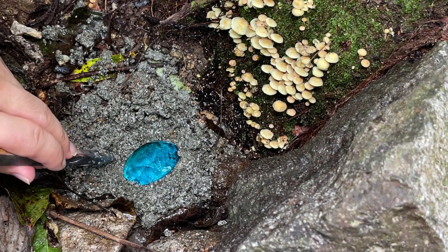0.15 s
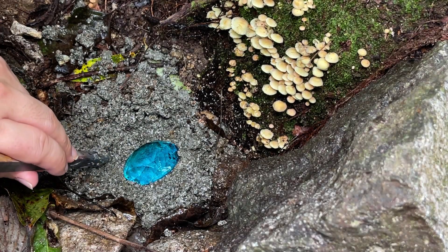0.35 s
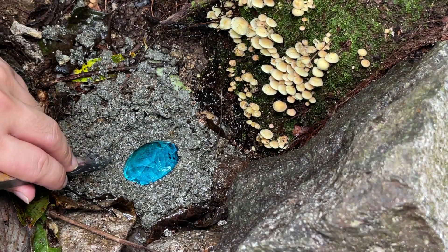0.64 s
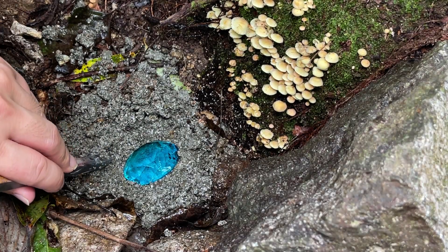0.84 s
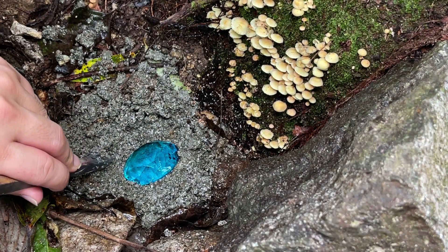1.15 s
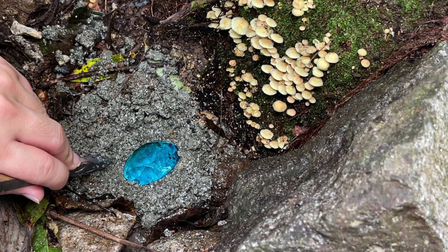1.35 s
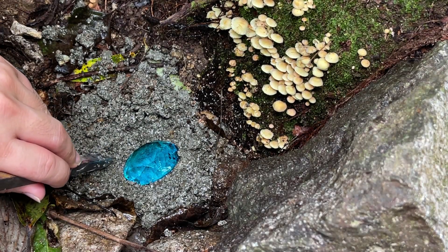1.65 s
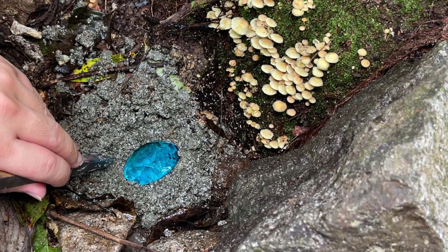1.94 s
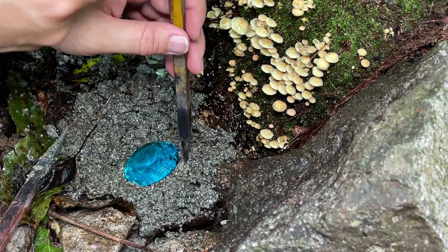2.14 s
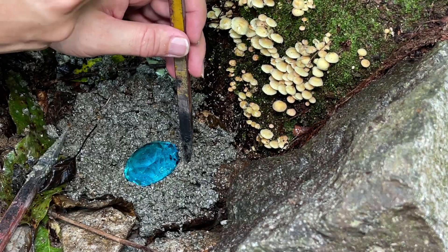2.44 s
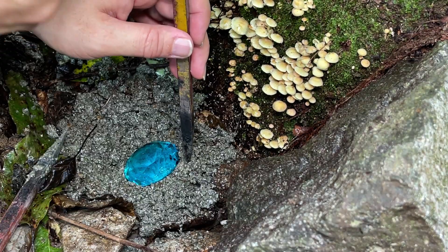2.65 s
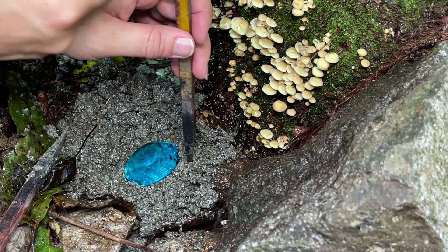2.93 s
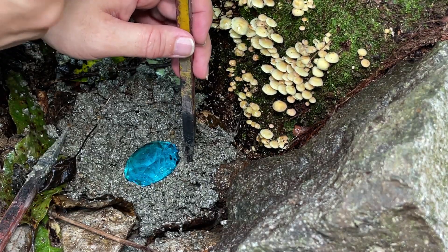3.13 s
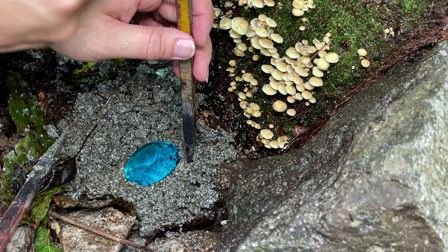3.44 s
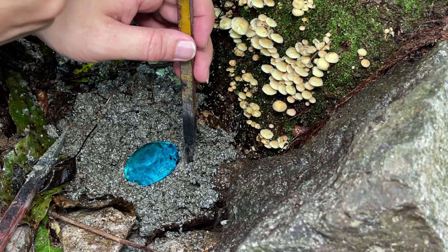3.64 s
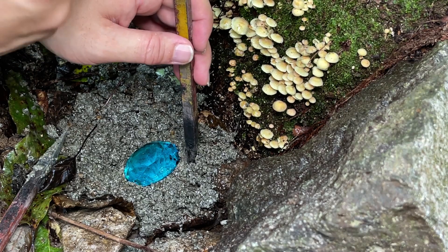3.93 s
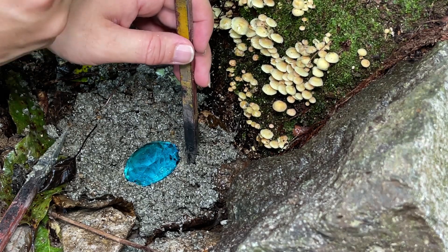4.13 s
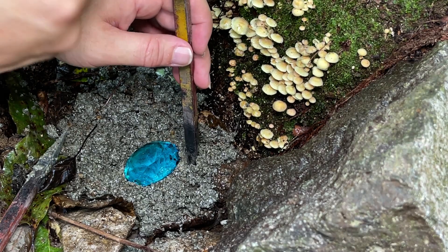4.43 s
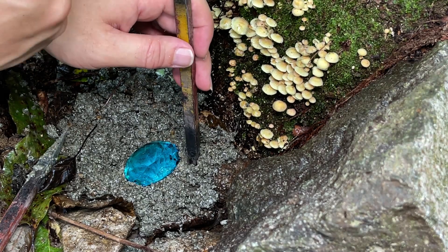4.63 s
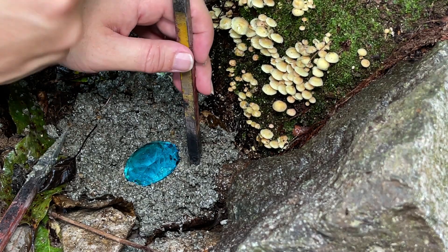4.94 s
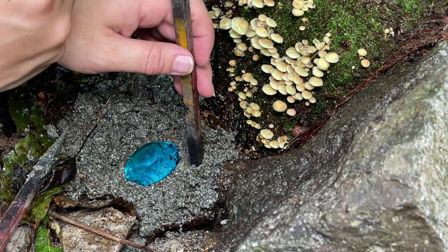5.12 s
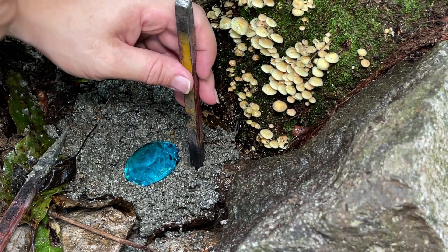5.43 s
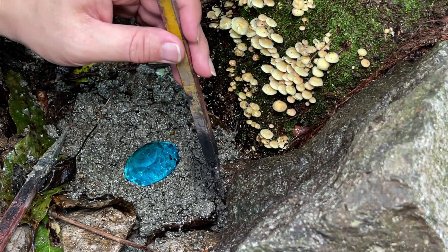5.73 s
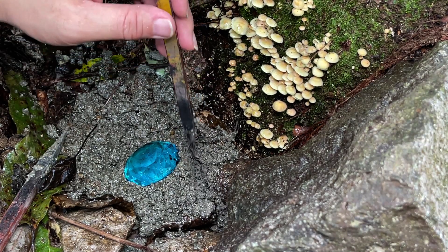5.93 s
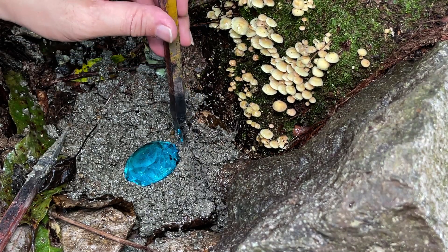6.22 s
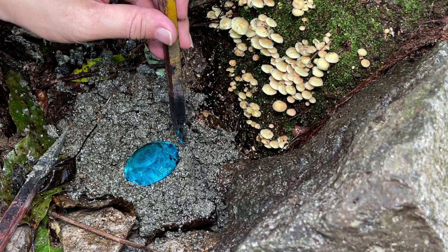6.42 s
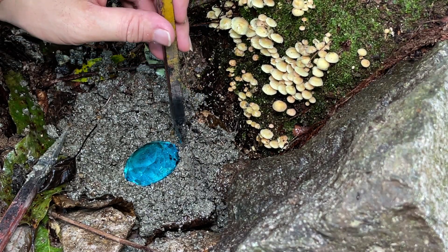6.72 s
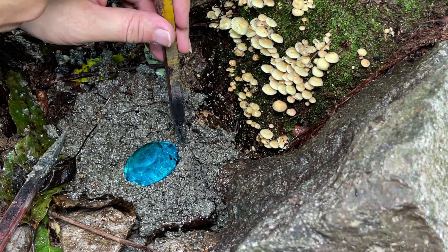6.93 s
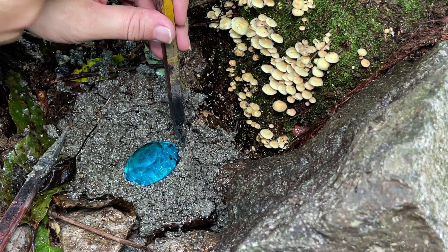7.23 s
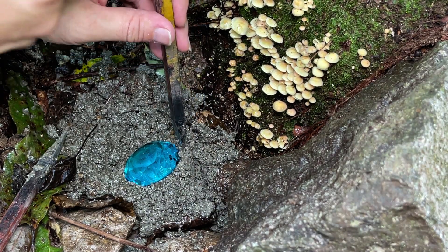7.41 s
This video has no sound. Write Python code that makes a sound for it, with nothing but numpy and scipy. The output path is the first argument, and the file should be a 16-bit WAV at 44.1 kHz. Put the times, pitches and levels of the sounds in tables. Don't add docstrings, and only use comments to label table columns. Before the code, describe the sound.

A steel chisel taps sharply into gritty stone in steady bursts, pauses to scrape, then resumes, over faint insect hiss in a quiet forest.

```python
import sys
import numpy as np
from scipy import signal
from scipy.fft import rfft, irfft
from scipy.io import wavfile

SR = 44100
rng = np.random.default_rng(int(sys.argv[2]) if len(sys.argv) > 2 else 0)


def elevation(decibels):
    levels = np.asarray(decibels, float)
    return 10 ** (levels / 20)


def put_to_file(sound):
    columns = np.atleast_2d(sound).T
    safe = np.clip(columns, -1, 1)
    whole_steps = np.round(safe * 32767)
    wavfile.write(sys.argv[1], SR, whole_steps.astype(np.int16))


N = 333837

# [t/s, peak level/dB, then relative to it: tip/dB, shaft/dB, brightness/dB]
LOW_BLOWS = [
    (0.174, -63.5, 20, 1, -42),
    (1.011, -14.5, -8, -12.5, -25.5),
    (1.252, -11, -15.5, -15, -35),
    (1.484, -13, -24, -15.5, -29.5),
    (1.719, -13.5, -18, -13.5, -22.5),
    (1.938, -12.5, -14, -11.5, -30.5),
]
UPRIGHT_BLOWS = [(2.244, -6, -10.5, -13, -24), (2.512, -8, -10, -8, -22), (2.79, -7, -7, -9.5, -25.5),
                 (3.038, -17.5, -23, -23, -21.5), (3.293, -7, -12.5, -12.5, -19),
                 (3.557, -5, -10.5, -11, -25), (3.812, -8.5, -14.5, -19, -25.5),
                 (4.081, -1.5, -17, -4.5, -16), (4.323, -1.5, -11, -11.5, -22.5),
                 (4.573, -2, -10, -10.5, -16.5), (4.832, -3, -7.5, -16.5, -19),
                 (5.085, -6, -5.5, -17, -25.5), (5.32, -6.5, -6.5, -21, -28.5),
                 (7.011, -26.5, -12, -24.5, -32), (7.246, -7.5, -4, -10, -22.5),
                 (7.526, -3, -12, -13, -20.5)]
# [t/s, peak level/dB, tip relative to it/dB]
BOUNCES = [(2.255, -23, -8.5), (2.532, -29, -8), (2.796, -18, -34), (3.818, -18.5, -6.5),
           (4.095, -16.5, -15.5), (4.328, -16.5, -14), (4.585, -21, -21), (4.841, -16.5, -17.5),
           (4.848, -33, -10), (7.26, -26.5, -24.5), (7.537, -24.5, -35.5)]
LOOSE_TIMES = [1.719, 2.79, 3.038, 3.812, 4.081, 4.573, 4.832, 5.085, 5.32, 7.011]
SEATED_TIMES = [3.038, 3.293, 3.557, 3.812, 4.832, 5.32, 7.011, 7.246]
LOW_MODES = [440, 620, 780, 1190, 1500, 1900, 2300, 2330, 2690, 3060, 3150, 3200, 4110, 4680, 5900, 6160,
             9200, 9570, 11700, 12650, 13280, 15100]
# [width/Hz, height/dB]
LOW_BODY = [(183, -35), (180, -31.5), (156.7, -22.5), (103, -14.5), (200, -23.5), (196, -21.5), (990, 7),
            (131, -9), (104, -12), (90.6, -6.5), (30, -15.5), (6.89, -41.5), (112, -20.5), (173, -13),
            (72.6, -18.5), (95.7, -27.5), (200, -20), (150, -18), (250, -44), (100, -31), (35, -43.5),
            (250, -34.5)]
UPRIGHT_MODES = [392, 610, 1100, 1600, 1880, 2140, 2300, 2540, 3360, 3500, 3560, 3900, 4350, 5100, 5400,
                 5740, 6350, 6600, 7950, 8350, 9280, 9950, 10290, 11700, 13610, 14835, 15480]
# [width/Hz, height/dB]
UPRIGHT_BODY = [(184, -21.5), (185.2, -21.5), (255.3, -26.5), (198.3, -7), (216, -4.5), (257, -2),
                (1046.5, 0.5), (300, -2), (153.04, -8.5), (15.2, -52), (73, -22), (150.5, -17.5),
                (102, -27.5), (273, -14), (149, -19.5), (132, -25), (108, -18.5), (146, -21), (53.3, -41),
                (490, -26), (120, -34.5), (194, -25.5), (128, -30), (505, -31.5), (35, -33.5),
                (67.8, -38.5), (200, -30)]
# [f/Hz, level/dB per Hz]
CRUNCH = [(88, -47.5), (150, -28), (571, -13), (830, -17), (2130, 0), (3490, -4), (4600, -20.5),
          (6420, -4.5), (7220, -20), (13600, -21), (16500, -34.5)]
# [t/s, f/Hz, width/Hz, level/dB]
PINGS = [
    (0.171, 3150, 40, -71),
    (1.013, 3170, 9, -60.5),
    (2.255, 3500, 70, -42),
    (2.535, 3500, 70, -47),
    (7.013, 3560, 10, -77),
]
SOIL_MODES = [86, 112, 150, 213]
# [level/dB, decay by 60 dB/s]
SOIL_DECAY = [(-57.5, 0.27), (-57, 0.3), (-56, 0.19), (-62.5, 0.36)]
# [f/Hz, level/dB per Hz]
RETURN_COLOUR = [(410, -51), (700, -21.5), (1950, 3.5), (2650, 4), (3690, 5), (4490, -9.5), (6240, 4),
                 (7880, -27.5), (10100, -16.5), (13000, -21)]
# [t/s, length/s, level/dB]
DRAGS = [
    (5.5, 0.13, -72),
    (5.6, .12, -70),
    (5.751, .07, -88),
    (6.43, .04, -87),
]
# [t/s, peak level/dB]
TICKS = [(0.0667, -72), (0.167, -52), (0.4394, -57), (0.4794, -65), (1.3663, -56), (5.6116, -72.5),
         (5.648, -63), (5.7673, -65), (5.7944, -78.5), (5.8644, -86.5), (6.4494, -67.5), (6.4996, -52)]
# [f/Hz, level/dB per Hz]
CICADAS = [(2820, -57.5), (4800, -27), (5000, -29), (5090, -22.5), (5360, 0), (5980, 2.5), (6750, -4.5),
           (7200, -23.5), (7400, -26), (9620, -44), (16300, -120)]
CRICKET_PITCHES = [7480, 7790, 8060, 8460, 8760, 9290]
# [width/Hz, level/dB]
CRICKETS = [(93, -1), (49.12, -2), (59.56, 1), (72, -2.5), (78.73, -5.5), (94.45, -8)]
# [t/s, cricket level/dB, leaf level/dB]
CHORUS = [(0, -76, -77.5), (.5, -74, -77.5), (2.1, -75.5, -90.5), (2.2, -82.5, -79.5), (3.3, -86, -92),
          (4.8, -83.5, -79.5), (5.6, -84.5, -85), (6.35, -86, -90.5), (6.9, -76, -91.5), (7.57, -77, -88.5)]
# [t/s, length/s, start f/Hz, end f/Hz,
# level/dB]
BUZZES = [(0.169, 0.024, 2924, 3280, -65), (0.162, 0.14, 4450, 4450, -75.5), (1.571, 0.13, 7300, 6000, -68),
          (1.67, .1, 5600, 5000, -70), (2.775, 0.41, 4430, 4900, -82), (4.747, 0.09, 2000, 2100, -68),
          (5.012, .07, 2100, 2100, -67), (5.756, .045, 2800, 2800, -77), (6.1, 0.55, 3900, 3300, -90)]
BUZZ_WIDTHS = (500, 900, 500, 500, 90, 700, 700, 600, 300)
# [t/s, length/s, f/Hz, level/dB]
COOS = [(2.84, 0.13, 468, -81), (3.327, .19, 411, -83), (3.868, 0.19, 380, -86.5), (4.43, .1, 503, -87),
        (4.627, 0.13, 476, -81), (5.138, 0.18, 408, -82), (5.54, .43, 380, -86), (6.253, .14, 392, -86),
        (6.472, 0.28, 470, -82), (7.048, 0.17, 396, -83)]
# [f/Hz, level/dB per Hz]
LEAVES = [(530, -18), (900, -8.5), (1040, -6), (1180, -5.5), (3200, -4.5), (4760, -17.5), (5200, -3.5),
          (6760, -31.5), (11400, -120)]
# [f/Hz, level/dB per Hz]
FAR_FOREST = [(150, -31), (230, -15), (400, -8), (620, -11.5), (1000, -14), (2400, -27), (4500, -19.5),
              (7000, -21), (8500, -15), (10000, -21.5), (16000, -29.5)]
# [t/s, level/dB]
WIND = [(0.0, -70.5), (2.17, -60), (2.32, -44.5), (3.01, -51.5), (4.15, -43.5), (4.24, -58.5), (4.72, -47),
        (5.17, -43.5), (5.37, -52.5), (5.65, -41), (6.11, -44.5), (6.39, -45), (6.47, -48.5), (7.57, -55.5)]
# [f/Hz, level/dB per Hz]
RUMBLE = [(15, -1.5), (30, -4.5), (60, -9), (120, -14), (220, -18), (320, -38)]

CHANGE_S = (2.102, 2.204)


def rms_one(x):
    return x / np.sqrt(np.mean(x ** 2) + 1e-20)


def in_time(rows):
    s, *columns = np.transpose(rows)
    return [np.interp(np.arange(N) / SR, s, c) for c in columns]


def drift(rate_hz):
    r = np.exp(-2 * np.pi * rate_hz / SR)
    wander = signal.lfilter([1], [1, -2 * r, r * r], rng.standard_normal(N + SR))
    return rms_one(wander[SR:])


def coloured(spectrum, size):
    hz = np.fft.rfftfreq(size, 1 / SR) + 1
    points = np.array(spectrum)
    db = np.interp(np.log(hz), np.log(points[:, 0]), points[:, 1], left=-80, right=-80)
    return rms_one(irfft(rfft(rng.standard_normal(size)) * elevation(db), size))


def ring(x, hz, width_hz):
    r, w = np.exp(-np.pi * width_hz / SR), 2 * np.pi * hz / SR
    return signal.lfilter([0, np.sin(w)], [1, -2 * r * np.cos(w), r * r], x + 1e-18)


def rough_tone(hz, width_hz):
    return np.sqrt(2) * drift(width_hz) * np.sin(2 * np.pi * np.cumsum(hz) / SR)


def swell(start_s, length_s, edge):
    u = (np.arange(N) / SR - start_s) / length_s
    return np.sin(np.pi / 2 * np.clip(np.minimum(u, 1 - u) / edge, 0, 1)) ** 2


def highpass(x, order, hz):
    return signal.sosfilt(signal.butter(order, hz, "high", fs=SR, output="sos"), x)


def chisel():
    low = struck(LOW_BLOWS, ring_db=-19.5, bright_share=1.2, knock_db=-8, knock_share=1.78)
    upright = struck(UPRIGHT_BLOWS, ring_db=-40, bright_share=0.7, knock_db=-20, knock_share=1.43)
    bounces = [(*row, -27, -29) for row in BOUNCES]
    bounces = struck(bounces, ring_db=-28.5, bright_share=1.3, knock_db=-12, knock_share=1.3)
    out = blows(*low, LOW_MODES, LOW_BODY, crunch_db=-18, crunch_s=.005, grip_s=.014)
    out += blows(*upright, UPRIGHT_MODES, UPRIGHT_BODY, crunch_db=-17, crunch_s=.003, grip_s=.011)
    out += blows(*bounces, UPRIGHT_MODES, UPRIGHT_BODY, crunch_db=-22.5, crunch_s=0.013, grip_s=0.004)
    return out


def struck(table, ring_db, bright_share, knock_db, knock_share):
    rows = np.array(table)
    loose, seated = (np.abs(rows[:, :1] - times).min(axis=1) < .004 for times in (LOOSE_TIMES, SEATED_TIMES))
    top_ring_db = ring_db + bright_share * rows[:, 4] + 14 * loose
    stone_db = knock_db + knock_share * rows[:, 1] + 5.5 * seated
    return np.c_[rows, top_ring_db], stone_db


def blows(table, knocks_db, hz, body, crunch_db, crunch_s, grip_s):
    size = 4096
    out, t, hz = np.zeros(N + size), np.arange(size) / SR, np.array(hz)
    width_hz, height_db = np.transpose(body)
    zones_hz = np.log([700, 1200, 2800, 3300, 4300, 6100, 7500, 12000, 13000])
    bins_hz = np.fft.rfftfreq(size, 1 / SR) + 1
    choke = np.where((hz > 13000) | (width_hz < 25), 1, np.exp(-(t[:, None] / grip_s) ** 4))
    lasting = (width_hz < 25) & (hz < 13000)
    rise = 1 - np.exp(-np.outer(t, np.minimum(width_hz * 12, 5000.)))
    envelope = np.exp(-np.pi * np.outer(t, width_hz)) * rise * choke
    for (s, level_db, tip, shaft, bright, top_ring), knock_db in zip(table, knocks_db):
        def tilt(f, tip_db, last_db):
            middle = [tip_db + 13, (tip_db + shaft) / 2 + 13, shaft + 17]
            gains = [knock_db - level_db + 27.5, 0, 0, *middle, bright + 27, bright + 27, last_db]
            return np.interp(np.log(f), zones_hz, gains)

        luck = rng.standard_normal((2, len(hz)))
        detuned = hz * (1 + .002 * luck[1])
        modes = envelope * np.sin(2 * np.pi * np.outer(t, detuned))
        lasting_db = 2.2 * min(tip + 8, 0) - .6 * max(level_db + 14, -13) - 22
        mode_db = height_db + tilt(hz, tip, top_ring + 36) + lasting * lasting_db + 2 * luck[0]

        crushed = irfft(rfft(coloured(CRUNCH, size)) * elevation(tilt(bins_hz, -9.5, bright + 27)))
        crack = irfft(rfft(crushed) * (bins_hz > 7000))
        crunch = (crushed - crack) * np.exp(-t / crunch_s) * (1 - np.exp(-t / 0.000067))
        crunch += elevation(7.5) * crack * np.exp(-t / 0.00068)

        i = round((s + 0.00025) * SR)
        out[i:i + size] += elevation(level_db) * (elevation(crunch_db) * crunch - modes @ elevation(mode_db))
    return highpass(out[:N], 3, 320)


def pings():
    out = np.zeros(N)
    for s, hz, width_hz, db in PINGS:
        touch = np.zeros(N)
        touch[round(s * SR)] = 1
        out += elevation(db) * ring(touch, hz, width_hz)
    return out * elevation(1.5 * drift(40))


def ground_thump():
    s, level_db = np.array(LOW_BLOWS + UPRIGHT_BLOWS)[:, :2].T
    at = (s * SR).astype(int)
    slant_db = -5.5 * (s < CHANGE_S[0])
    shake_db = 2.55 + 0.61 * level_db + slant_db + 10
    shake = np.zeros(N)
    for hz, (db, t60) in zip(SOIL_MODES, SOIL_DECAY):
        push = np.zeros(N)
        push[at] = elevation(shake_db + 2 * rng.standard_normal(len(s)))
        shake += elevation(db) * ring(push, hz, 3.4 / t60)
    r = np.exp(-1 / (0.0016 * SR))
    shake = signal.lfilter([1 - r], [1, -r], shake)

    settle = signal.lfilter([1], [1, -elevation(-60 / (.18 * SR))], push)
    settle *= coloured([(60, -6), (100, 2), (250, -0.5), (400, -26.5)], N)

    blow = np.zeros(N)
    blow[at] = elevation(-38 + 4 + .5 * level_db) * (level_db > -40)
    slab = ring(blow, 160, 70)
    return highpass(slab + shake + elevation(-63.5) * settle, 2, 55)


def forest_return():
    t = np.arange(SR // 2) / SR
    rise_s, hold_s, t60_s = .04, .03, .45
    decay = elevation(-120 * np.maximum(t - rise_s - hold_s, 0) / t60_s)
    shape = np.minimum(t / rise_s, 1) ** 3 * decay
    power = np.zeros(N + len(t))
    for s, level_db, *_ in LOW_BLOWS + UPRIGHT_BLOWS:
        return_db = level_db - 61.5 + 1 * (s < CHANGE_S[0])
        i = round(s * SR)
        power[i:i + len(t)] += elevation(2 * return_db) * shape
    return np.sqrt(power[:N]) * elevation(1.2 * drift(12)) * coloured(RETURN_COLOUR, N)


def grit():
    pressure = sum(elevation(db) * swell(s, length, edge=0.227) for s, length, db in DRAGS)
    clicks = rng.standard_normal(N) * (rng.random(N) < 3000 / SR) * elevation(2.5 * drift(40))
    # f/Hz, width/Hz, level/dB
    modes = [(3480, 50, -4), (3150, 250, -5), (10250, 90, -14), (13450, 150, -14),
             (14850, 70, -17), (2400, 1200, -6), (11000, 7000, 6), (6500, 3000, -2)]
    scrape = sum(elevation(db + 2 * drift(15)) * ring(clicks, hz, width) for hz, width, db in modes)
    ticks = np.zeros(N)
    for s, db in TICKS:
        i = round(s * SR)
        ticks[i:i + 88] = elevation(db - 8) * rng.standard_normal(88) * np.exp(-np.arange(88) / 30)
    return pressure * rms_one(scrape) + highpass(ticks, 2, 6000)


def insects(cricket_db):
    out = elevation(-69.5 + 1.3 * drift(37) + 0.23 * drift(1.5)) * coloured(CICADAS, N)
    crickets = np.zeros(N)
    for hz, (width_hz, db) in zip(CRICKET_PITCHES, CRICKETS):
        wander = hz * (1 + .004 * drift(2))
        crickets += elevation(db + 2 * drift(3)) * rough_tone(wander, .9 * width_hz)
    out += elevation(cricket_db) * rms_one(crickets)
    for (s, length, hz0, hz1, db), width_hz in zip(BUZZES, BUZZ_WIDTHS):
        hz, = in_time([(s, hz0), (s + length, hz1)])
        out += elevation(db) * swell(s, length, edge=.3) * rough_tone(hz, width_hz)
    return out


def dove():
    t = np.arange(N) / SR
    notes = np.zeros(N)
    for s, length, hz, db in COOS:
        mean_hz = hz + 30 * (length + s - t) / 2
        notes += elevation(db) * swell(s, length, edge=0.18) * np.sin(2 * np.pi * (t - s) * mean_hz)
    return np.sqrt(2) * notes * elevation(1.5 * drift(8))


def air(leaf_db):
    wind_db, = in_time(WIND)
    swings = signal.sosfilt(signal.butter(2, 12., fs=SR, output="sos"), drift(5.5))
    far = elevation(-78) * coloured(FAR_FOREST, N)
    leaves = elevation(leaf_db + 1.4 * drift(4)) * coloured(LEAVES, N)
    rumble = elevation(-71.5 + .12 * wind_db) * coloured(RUMBLE, N)
    return far + leaves + elevation(wind_db) * rms_one(swings) + rumble


def scene():
    cricket_db, leaf_db = in_time(CHORUS)
    close = chisel() + pings() + ground_thump() + forest_return() + grit()
    around = insects(cricket_db) + dove() + air(leaf_db)
    return (close + around)[None]


def ducked(x):
    out, above = x.copy(), signal.butter(2, 200, "high", fs=SR, output="sos")
    for s, level_db, *_ in UPRIGHT_BLOWS:
        if level_db <= -8.5:
            continue
        end = round((s - .003) * SR)
        start = (end - 490) // 1024 * 1024 + 490
        faint = signal.sosfiltfilt(above, x[:, start - 2048:end])[:, 2048:]
        fade = signal.windows.tukey(end - start, 128 / (end - start + 128))
        out[:, start:end] -= (1 - elevation(-35)) * fade * faint
    return out


def low_pass(x):
    return signal.sosfilt(signal.butter(12, 17080, fs=SR, output="sos"), x)


def record(dry):
    hiss = elevation(-92) * rng.standard_normal(N)
    x = 0.96 * np.tanh((dry + hiss) / 0.99)
    x = signal.sosfilt(signal.cheby2(10, 60, 17100, fs=SR, output="sos"), x)
    mix = ducked(x)
    a, b = (round(s * SR) for s in CHANGE_S)
    mix[:, a:b] = mix[:, a - 1:a] * np.exp(-np.arange(b - a) / 150)
    return low_pass(mix)


dry = scene()
out = record(dry)
put_to_file(out)
```